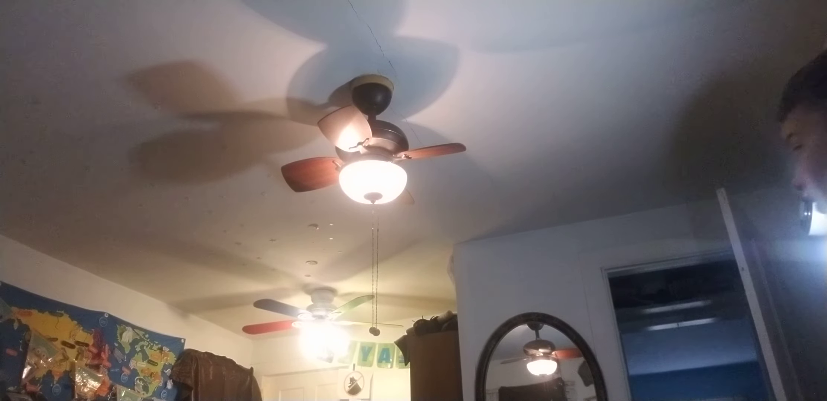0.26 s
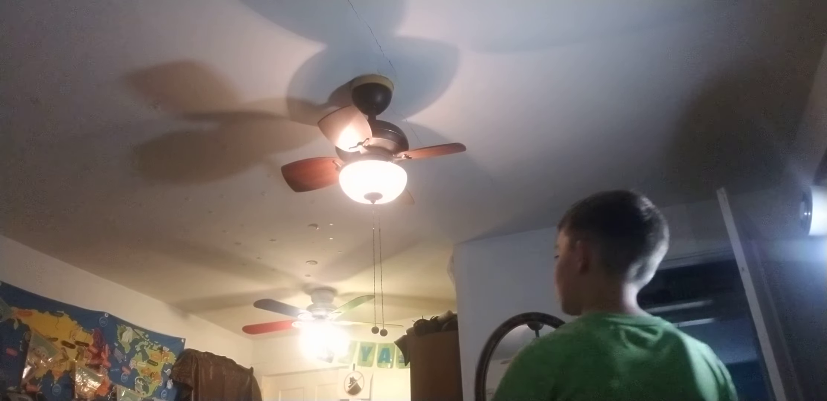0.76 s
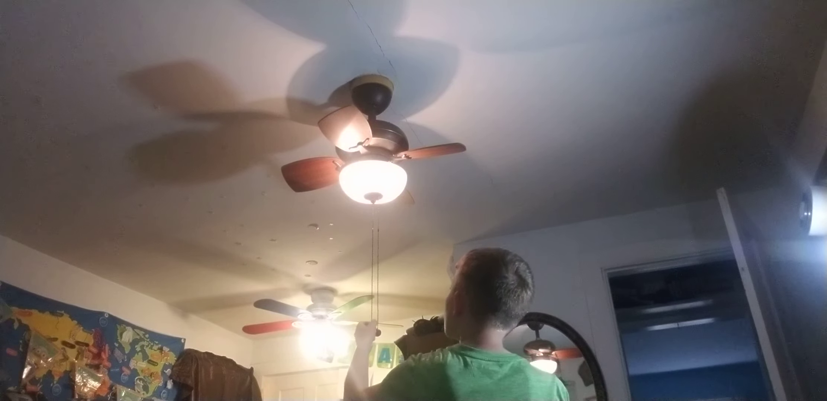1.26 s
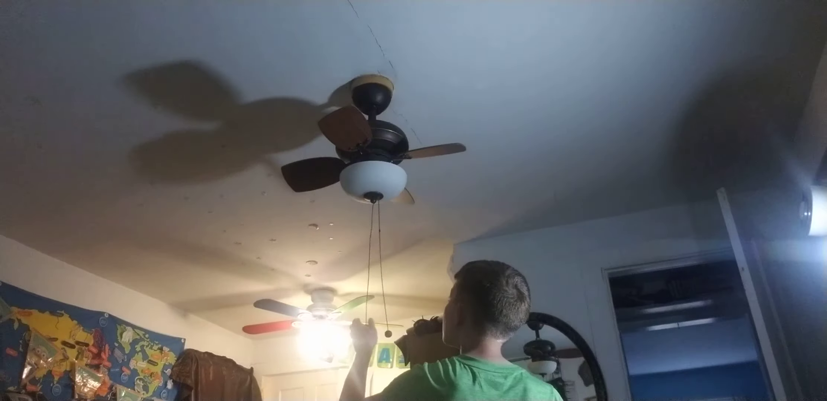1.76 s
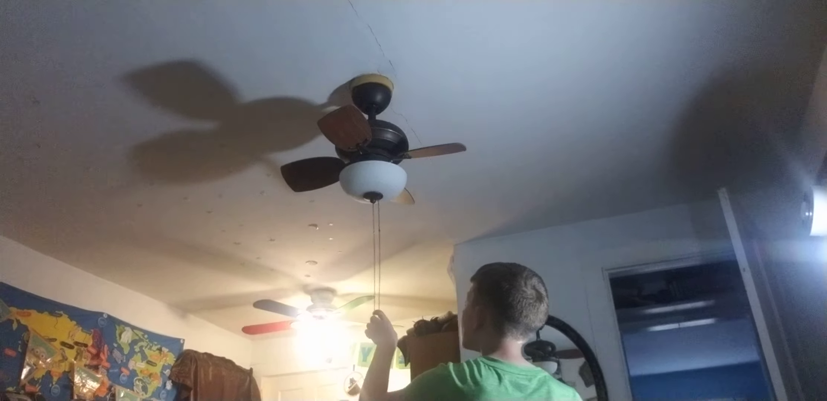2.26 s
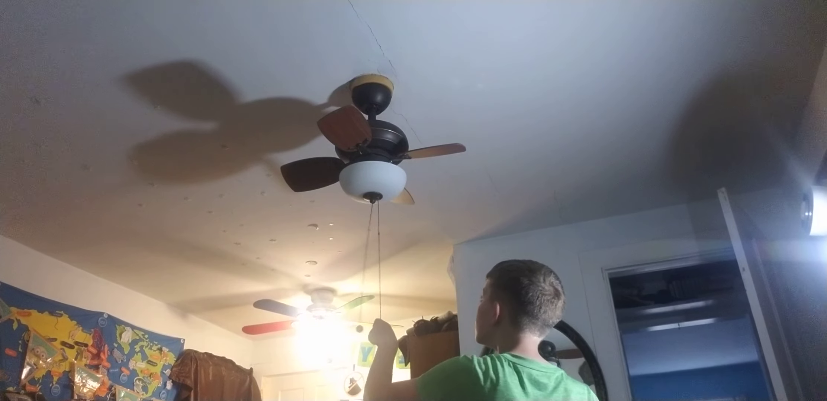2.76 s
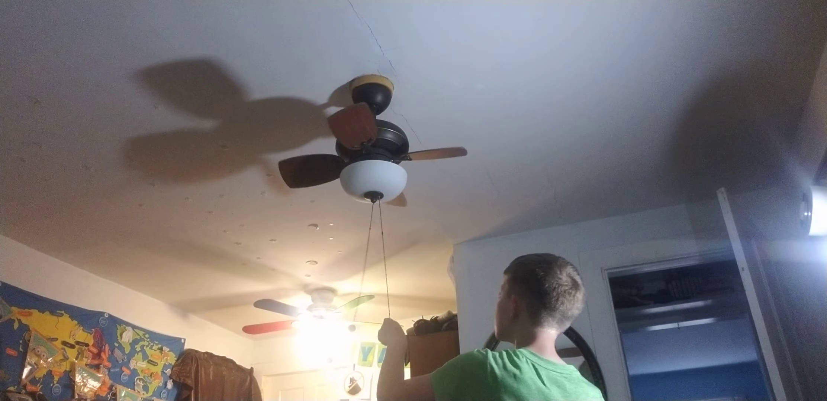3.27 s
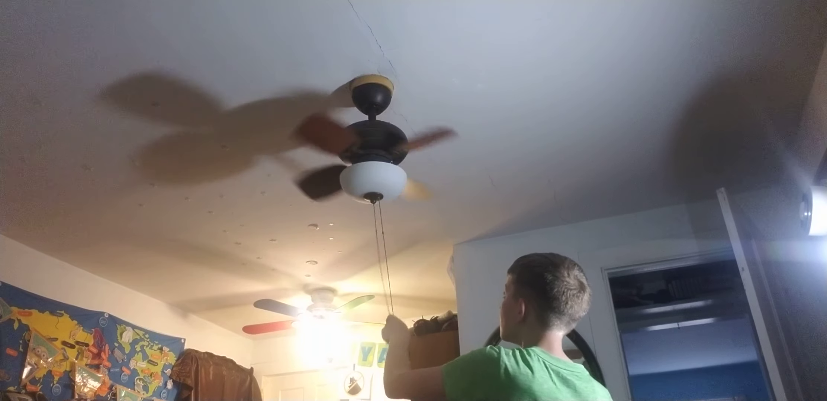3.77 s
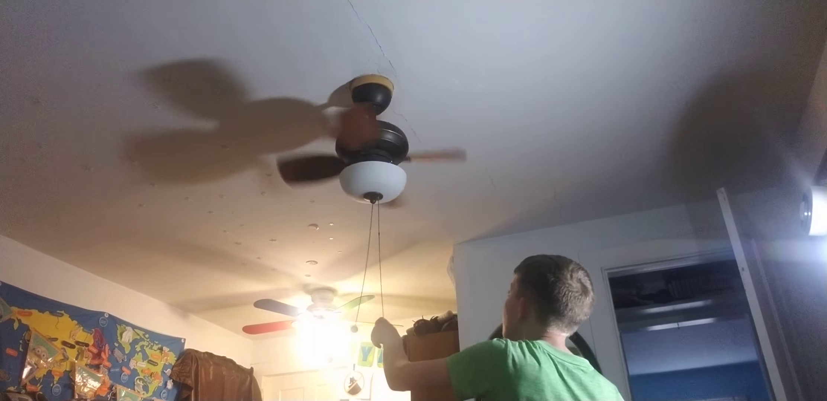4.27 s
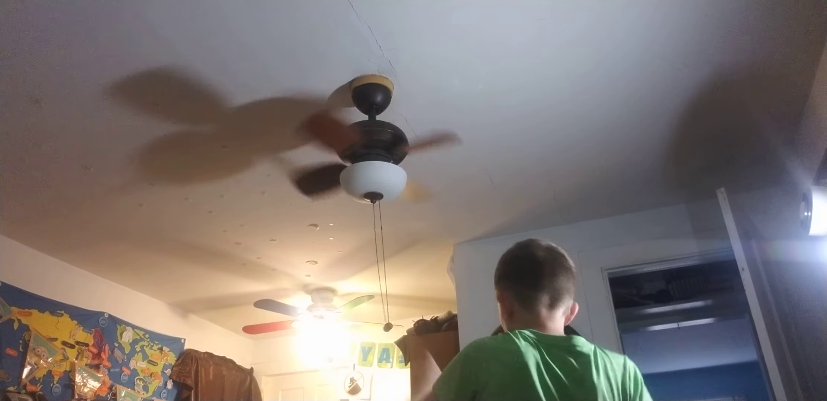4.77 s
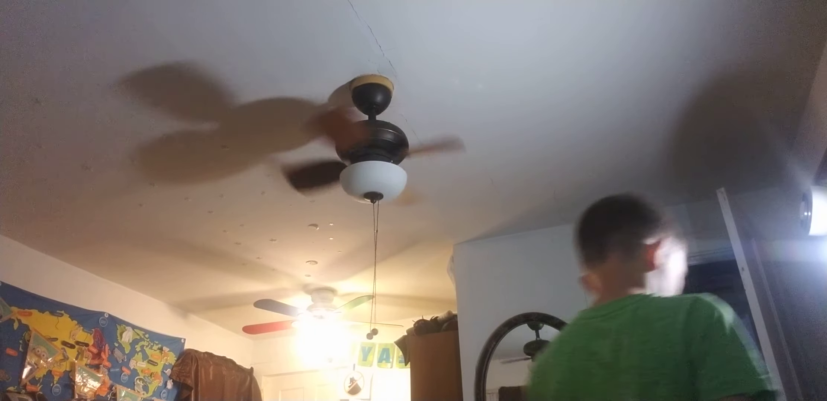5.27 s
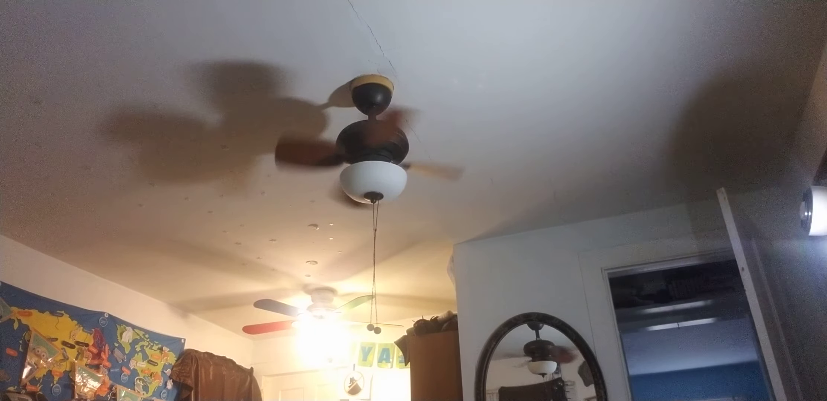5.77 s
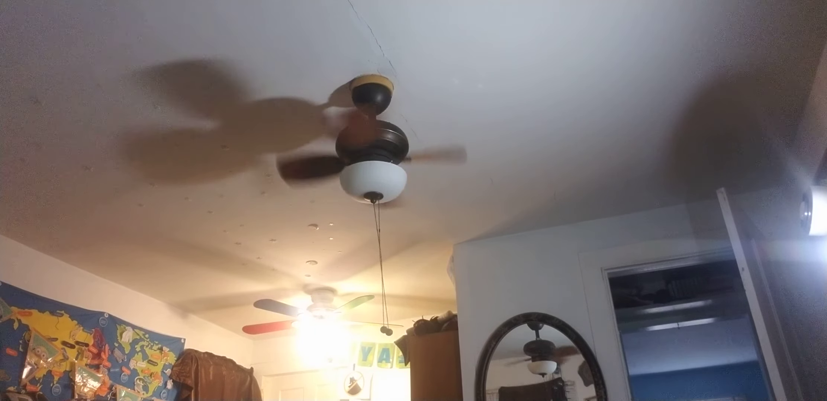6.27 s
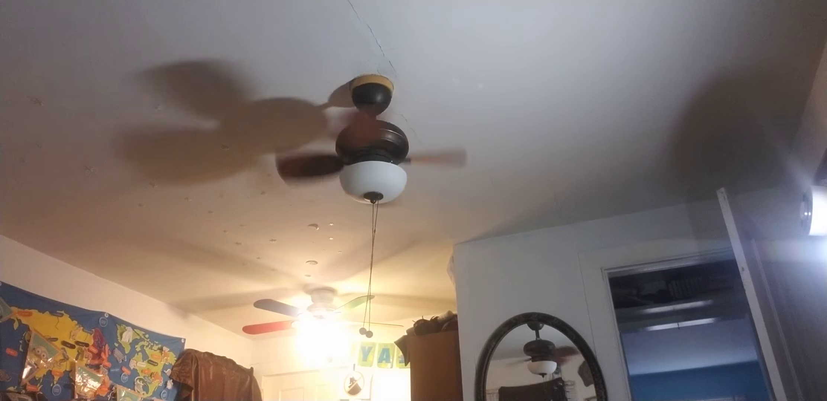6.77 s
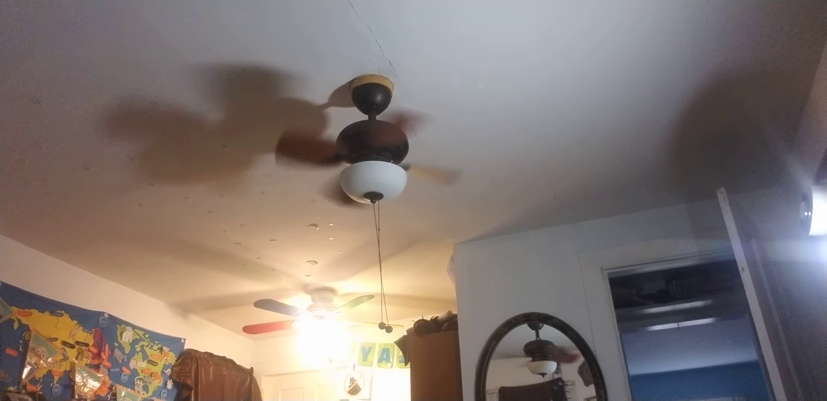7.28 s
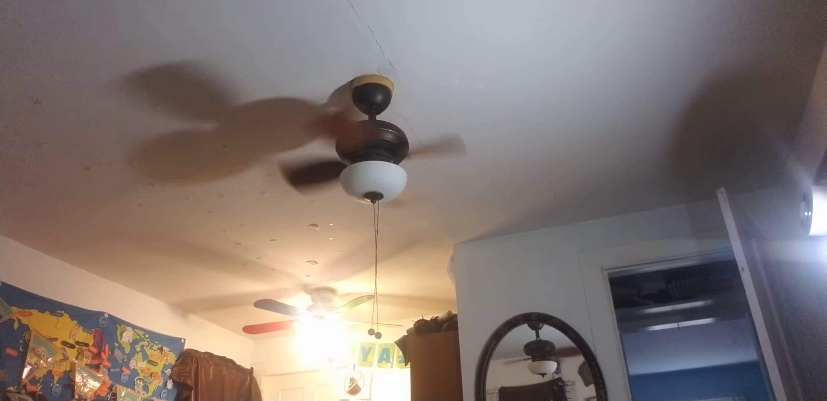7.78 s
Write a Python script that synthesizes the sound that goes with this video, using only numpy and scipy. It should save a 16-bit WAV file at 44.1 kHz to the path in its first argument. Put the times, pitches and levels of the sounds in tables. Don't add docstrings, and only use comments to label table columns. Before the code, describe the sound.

Ceiling fan pull chains worked close up: sharp metallic switch clacks, ratchet ticks and bead rattles over low steady hum, with footsteps on wooden boards.

```python
import sys
import numpy as np
from scipy import signal
from scipy.fft import rfft, irfft, next_fast_len
from scipy.io import wavfile
from scipy.ndimage import uniform_filter1d, map_coordinates

SR = 44100
rng = np.random.default_rng(int(sys.argv[2]) if len(sys.argv) > 2 else 0)


def boost_factor(decibels):
    exponent = np.asarray(decibels, float) / 20
    return 10 ** exponent


def master_out(mix):
    frames = np.transpose(np.atleast_2d(mix))
    ceiling = np.clip(frames, -1, 1)
    pcm = np.round(ceiling * 32767).astype(np.int16)
    wavfile.write(sys.argv[1], SR, pcm)


N = 354167

# pitch_hz, left_minus_right_db
PORT_LEAN = [(60, 2), (110, -0.5), (200, 5), (380, 3), (700, -0.5), (1290, 11.5), (2380, 4), (4400, 7.5),
             (8120, 5.5), (15000, -3.5)]
# pitch_hz, width_hz, level_db
HOUSING_MODES = [(712, 60, 7), (860, 60, 6), (1675, 80, 6), (1884, 70, 5), (2026, 90, 6), (2447, 90, 5),
                 (2885, 100, 4), (3940, 200, 8), (4200, 200, 6), (4575, 200, 8), (6000, 200, 4),
                 (6536, 120, 7), (6996, 150, 8), (9000, 200, 6), (10300, 300, 4), (11900, 300, 7),
                 (12400, 300, 7), (13700, 300, 4)]


def along(points, hz):
    f, v = np.transpose(points)
    return np.interp(np.log(hz + 1), np.log(f + 1), v)


def unit(x):
    return x / np.sqrt(np.mean(x ** 2) + 1e-20)


def bumps(modes, hz):
    return sum(db / (1 + (2 * (hz - c) / w) ** 2) for c, w, db in modes)


def curves(tables):
    out = np.full((len(tables[0][0]) - 1, N), -200.)
    for rows in tables:
        s, *cols = np.transpose(rows)
        k = np.arange(int(s[0] * SR), min(N, int(s[-1] * SR)))
        out[:, k] = [np.interp(k / SR, s, c) for c in cols]
    return out


def swells(start, peak, db, fall, stop=np.inf):
    rise_db, damping_db_per_s = 18.5, 2000
    t = np.arange(0, N + 64, 32)[:, None] / SR
    rising = rise_db * (peak - t) / np.maximum(peak - start, .002)
    below = np.where(t < peak, rising, fall * (t - peak))
    level = db - below - damping_db_per_s * np.maximum(t - stop, 0)
    return np.interp(np.arange(N) / SR, t[:, 0], level.max(axis=1))


def wobble(rate):
    coarse = np.arange(0, N + 16, 16)
    knots = rng.standard_normal(int(N * rate / SR) + 4)
    return np.interp(np.arange(N), coarse, map_coordinates(knots, [coarse * rate / SR]))


def ports(pair, colour_db):
    # pitch_hz, left_right_likeness
    likeness = [(60, 0.49), (130, 0.88), (290, 0.67), (640, 0.54), (1410, -0.26), (3100, 0.05),
                (6820, -0.037), (15000, -0.07)]
    m = next_fast_len(pair.shape[1] + 4096)
    hz = np.fft.rfftfreq(m, 1 / SR)
    turn = np.arccos(np.clip(along(likeness, hz), -1, 1)) / 2
    mid, side = rfft(pair, m) * boost_factor(colour_db(hz)) * [np.cos(turn), np.sin(turn)]
    lean = boost_factor(along(PORT_LEAN, hz) / 2)
    return irfft([(mid + side) * lean, (mid - side) / lean], m)[:, :pair.shape[1]]


def rush(colour_db):
    return unit(ports(rng.standard_normal((2, N)), colour_db))


def tail(direct_db, patchy_db, length_s=.33):
    # pitch_hz, t60_s
    room_decay = [(300, 0.1), (1000, 0.24), (2800, 0.28), (7000, 0.2), (15000, 0.2)]
    blow_db, blow_t60 = -1.5, 0.0065
    n = int(length_s * SR)
    hz, t, z = signal.stft(rng.standard_normal((2, n)), SR, nperseg=256)
    patches = uniform_filter1d(rng.standard_normal(z.shape[1:]), size=4, axis=0)
    patches = unit(uniform_filter1d(patches, size=3, axis=1))
    decay_db = 60 * t / along(room_decay, hz)[:, None]
    late = signal.istft(z * boost_factor(patchy_db * patches - decay_db), SR, nperseg=256)[1][:, :n]

    t = np.arange(n) / SR
    body = boost_factor(-60 * t / 0.022) * (1 - np.exp(-t / 0.0022))
    blow = boost_factor(blow_db - 60 * t / blow_t60) * (1 - np.exp(-t / 0.00035))
    return late * boost_factor(direct_db) * (body + blow), late * (1 - np.exp(-t / 0.0065))


def in_room(x, direct_db):
    room = sum(tail(direct_db, patchy_db=0))
    return signal.fftconvolve(x, room / np.linalg.norm(room[0]), axes=1)[:, :N]


def add(bus, s, sound):
    k = round(s * SR)
    bus[:, k:k + sound.shape[1]] += sound[:, :N - k]


def body_curve(knock, shell, snap, tick, tinkle, valley_db):
    return [(150, knock - 14), (380, knock + 3), (900, knock + 3),
            (1300, shell - 2), (2050, shell + 4), (2700, shell + 2),
            (3400, valley_db), (4400, snap), (5500, valley_db - 0.5),
            (6800, tick + 2), (8300, tinkle - 9), (12000, tinkle - 5), (16000, tinkle - 9)]


def cracks(events, modes, gain_db, direct_db, valley_db):
    bus = np.zeros((2, N))
    for s, db, knock, shell, tick, tinkle in events:
        early_curve = body_curve(knock, shell, 2.2, tick, tinkle, valley_db)
        late_curve = body_curve(knock, shell, -9, tick, tinkle, valley_db)
        struck = [(c * (1 + rng.normal(0, .004)), w, level + rng.normal(0, 2)) for c, w, level in modes]
        crack, late = tail(direct_db, patchy_db=3.0)
        near = ports(crack[:, :SR // 20], lambda hz: along(early_curve, hz) + bumps(struck, hz))
        far = ports(late, lambda hz: along(late_curve, hz) + 0.78 * bumps(struck, hz))
        add(bus, s, boost_factor(db + gain_db) * near)
        add(bus, s, boost_factor(db + gain_db) * far)
    return bus


def thuds(events):
    bus, t = np.zeros((2, N)), np.arange(SR // 3) / SR
    for s, db, hz, t60 in events:
        octaves, phases = np.r_[0, rng.normal(0, .4, size=11)], rng.random(12)
        ring = sum(boost_factor(-14 * abs(u)) * np.sin(2 * np.pi * (hz * 2 ** u * t + p))
                   for u, p in zip(octaves, phases))
        ring = 1.6 * ring / np.std(ring[:len(t) // 4])
        envelope = boost_factor(db - 60 * t / t60) * (1 - np.exp(-t / 0.014)) ** 2
        add(bus, s, (envelope * ring)[None] * boost_factor([[.5], [-.5]]))
    return bus


def rings(events, rise_s, split):
    bus, t = np.zeros((2, N)), np.arange(SR // 5) / SR
    for (s, db, hz, t60), chance in zip(events, rng.standard_normal((len(events), 4))):
        turns = hz * t + np.array([[0], [.25]]) * min(hz / 900, 1)
        trio = np.sin(2 * np.pi * turns)
        for u, p in chance.reshape(2, 2):
            trio = trio + .5 * np.sin(2 * np.pi * (turns * (1 + split * u) + p))
        lean_db = along(PORT_LEAN, hz) / 2 * np.array([[1], [-1]])
        add(bus, s, boost_factor(db - 60 * t / t60 + lean_db) * (1 - np.exp(-t / rise_s)) * trio)
    return bus


def motor():
    # pitch_hz, level_db
    hum_tones = [(16.2, -72), (58.4, -49), (81.8, -62), (117, -60), (120.03, -40.7), (178.4, -58),
                 (240.06, -68), (711, -75), (1093, -74)]
    # pitch_hz, density_db
    air_colour = [(12, -35.5), (25, -3.5), (55, -1.5), (80, 1), (120, 0.5), (155, 2.5), (230, -5),
                  (320, -5.5), (480, -9.5), (1050, -14.5), (1300, -24), (2000, -32), (5000, -40),
                  (16000, -41)]
    # pitch_hz, width_hz, level_db
    whine_humps = [(1101, 42, 5), (1640, 240, 4), (12800, 1700, 8.5)]
    beat_peak_s, beat_period_s, beat_depth = 4.98, 5.9, 0.4
    air_level_db = -52.5

    t = np.arange(N) / SR
    beat = 1 + beat_depth * np.cos(2 * np.pi * (t - beat_peak_s) / beat_period_s)
    tones = np.zeros(N)
    for k, (hz, db) in enumerate(hum_tones):
        tone = boost_factor(db + 0.14 * wobble(17)) * np.cos(2 * np.pi * hz * (t - .2))
        tones += tone * (beat if k == 1 else 1)
    air = rush(lambda hz: along(air_colour, hz) + bumps(whine_humps, hz))
    return np.sqrt(2) * tones + boost_factor(air_level_db + .8 * wobble(3)) * air


def footfalls():
    # start_s, peak_db, pitch_hz, t60_s
    heels = [(.13, -38.5, 172, 0.11), (0.375, -32.5, 161, 0.23), (0.442, -29, 51, 0.1),
             (0.951, -22, 147, 0.071), (2.641, -30.5, 156.5, 0.13), (4.665, -31, 218, 0.12),
             (5.321, -28.5, 158.5, 0.26), (5.329, -34, 50.3, 0.17), (5.781, -35.5, 181, 0.17),
             (5.912, -33, 170, 0.19), (6.108, -29, 106, 0.23), (6.121, -37, 44.4, 0.36),
             (6.482, -34.5, 55, 0.3), (6.571, -35.5, 59.2, 0.3)]
    # start_s, peak_db, pitch_hz
    board_hits = [(0.199, -44, 294), (.41, -45, 300), (0.461, -39.5, 334), (.5, -48, 359),
                  (0.869, -47, 305), (0.999, -44.5, 255), (4.661, -37, 331), (4.67, -48, 617),
                  (4.849, -44, 261), (5.332, -34.5, 280), (5.42, -41.5, 279), (5.93, -44, 747),
                  (5.985, -39.5, 372), (6.129, -40, 296), (6.479, -38, 300), (6.6, -43, 288)]
    # start_s, peak_db, pitch_hz, t60_s
    creaks = [(.199, -45, 1200, .05), (.207, -40, 614, 0.052), (1.18, -66, 2500, 0.44),
              (1.23, -60, 2460, 0.36), (4.66, -39, 201, .08), (4.66, -48, 1200, 0.046),
              (4.69, -49.5, 1100, .08), (4.855, -51, 885, 0.052), (5.31, -48, 505, 0.17),
              (5.34, -49.5, 670, 0.14), (5.4, -48, 363, .12), (5.788, -47, 1000, .06),
              (5.84, -38, 1035, 0.13), (5.85, -49, 1320, 0.14), (5.79, -52, 192, 0.092),
              (5.92, -43, 193, .12), (6.104, -49, 765, .07), (6.104, -51, 1300, 0.052),
              (6.13, -47.5, 1570, 0.062), (6.16, -58, 1580, .06), (6.178, -52, 1050, .08),
              (6.195, -47, 990, 0.095), (6.486, -30.5, 170, 0.094), (6.487, -45, 530, .08),
              (5.333, -28, 276, .08), (5.338, -50, 1100, .07), (.203, -47, 292, 0.29),
              (6.105, -39, 240, .06)]
    # start_s, peak_db, knock_db, brightness_db
    sole_taps = [(0.1993, -57, 16.5, -0.5), (.209, -62, 10, -6), (0.854, -58.5, 10, 3),
                 (.955, -62, 10, -11), (4.662, -52.5, 9, -4), (4.685, -56, 12, -4),
                 (4.8545, -56.5, 14.5, 3.5), (5.33, -61, 14, -6), (5.242, -75, -2, 3), (5.4184, -56, -7, 4),
                 (5.5785, -80, 2.7, 2), (6.1024, -57.5, 18, 3.5), (6.4865, -58.5, 16.5, -14)]
    shell_db, tick_db, tinkle_db = -5, -6, -0.5
    board_t60, board_ref_hz, board_damping = 0.14, 300, 0.32

    boards = [(s, db, hz, board_t60 * (board_ref_hz / hz) ** board_damping) for s, db, hz in board_hits]
    taps = [(s, db, knock, shell_db, tick_db + bright, tinkle_db + bright)
            for s, db, knock, bright in sole_taps]
    tapping = cracks(taps, [], gain_db=6.0, direct_db=-2.5, valley_db=-7.0)
    return thuds(heels + boards) + rings(creaks, rise_s=0.0022, split=0.046) + tapping


def rubbing():
    # start_s, peak_s, sole_db, cloth_db
    scuffs = [(-.05, 0.02, -58.5, -53.5), (0.196, 0.198, -55, -67), (.28, 0.362, -80, -64.5),
              (.34, 0.502, -62.5, -65.5), (0.398, 0.693, -72, -66.5), (0.836, 0.889, -58.5, -63),
              (.97, 1.034, -74, -67), (1.178, 1.246, -51, -58), (4.54, 4.582, -85, -64.5),
              (4.53, 4.61, -84, -61), (4.655, 4.687, -51.5, -59), (4.66, 4.76, -58.5, -66),
              (4.84, 4.86, -70, -68), (4.798, 4.952, -60, -68.5), (5.242, 5.323, -59.5, -59.5),
              (5.405, 5.407, -58.5, -60), (5.779, 5.821, -51.5, -52), (5.785, 5.852, -49, -55.5),
              (5.85, 6.023, -63, -67), (6.095, 6.115, -57.5, -60), (6.08, 6.188, -49.5, -50.5),
              (6.464, 6.598, -62, -61.5), (6.63, 6.728, -71, -59), (7.03, 7.083, -89, -71.5),
              (7.26, 7.324, -68, -63.5), (7.405, 7.42, -75, -71), (7.65, 7.738, -72, -92)]
    # start_s, peak_s, level_db
    grit_strokes = [
        (1.196, 1.245, -58),
        (4.678, 4.745, -58.5),
        (5.23, 5.244, -61),
        (5.405, 5.412, -65),
        (5.573, 5.576, -62),
        (6.14, 6.193, -56),
        (6.8, 6.92, -74),
    ]
    # pitch_hz, density_db
    rub_colours = [
        [(300, -2), (700, -4), (1500, -8.5), (2500, -11), (4500, -18.5), (9000, -51)],
        [(2000, -13), (4000, -4), (6500, 2.5), (9000, -8), (16000, -15.5)],
        [(5000, -28), (9000, -6.5), (12500, 0.5), (16000, -4)],
    ]
    stroke_fall, grit_fall = 165, 212
    grit_under_cloth_db = -8.5

    start, peak, sole, cloth = np.transpose(scuffs)
    sole_db = swells(start, peak, sole, stroke_fall)
    cloth_db = swells(start, peak, cloth, stroke_fall)
    grit_db = np.maximum(swells(*np.transpose(grit_strokes), grit_fall), cloth_db + grit_under_cloth_db)
    out = np.zeros((2, N))
    for db, colour in zip((sole_db, grit_db, cloth_db), rub_colours):
        out += boost_factor(db + 1.7 * wobble(40)) * rush(lambda hz: along(colour, hz))
    return out


def lamp():
    # pitch_hz, width_hz, level_db
    lamp_modes = [(833, 300, 14), (1610, 230, 12), (2680, 330, 7.5), (3740, 540, 11), (4620, 400, 7.5),
                  (6000, 220, -2), (6820, 83, 18.5), (8600, 130, -5), (10760, 270, 10), (11800, 1100, 8)]
    # start_s, peak_db, knock_db, tick_db, tinkle_db (the last three over the snap band)
    lamp_pulls = [
        (1.509, -53, -1, -15, 2),
        (1.5318, -44.5, -21, -1, -2),
        (1.5516, -34, -10, -5, 13.5),
        (1.561, -45, -12, -8, 5),
        (1.661, -50, -7, 3, 8),
        (1.696, -44, -24, -1, 0),
        (1.7205, -29.5, -6, -6, 6),
        (1.8977, -56.5, 1, 4.5, 9),
        (2.0568, -61.5, 13, 8.5, 4),
    ]
    shell_db = -6
    contacts = [(s, db, knock, shell_db, tick, tinkle) for s, db, knock, tick, tinkle in lamp_pulls]
    return cracks(contacts, lamp_modes, gain_db=-6.0, direct_db=4.5, valley_db=-8.0)


def bead_ticks(rate):
    hits = rng.random((2, N)) < rate / SR
    return hits * rng.standard_normal((2, N)) * boost_factor(2.5 * rng.exponential(size=(2, N)))


def chain():
    # start_s, end_s, first_db, last_db
    rattles = [
        (1.51, 1.56, -63, -50),
        (1.662, 1.73, -62, -54),
        (2.568, 2.639, -53.5, -40.5),
        (2.654, 2.7, -52, -52),
        (3.0, 3.16, -63, -66.5),
        (3.161, 3.24, -45, -52),
        (3.464, 3.536, -46.5, -39),
        (3.744, 3.8, -51, -51.5),
        (3.982, 4.076, -61, -29.5),
        (4.28, 4.38, -55, -48),
    ]
    # pitch_hz, density_db
    bead_colour = [(880, -37), (1500, -7.5), (1690, -9.5), (1960, -12), (2860, -6.5), (3380, -43),
                   (4000, 1), (4590, -8), (5940, -34), (6760, 1), (7390, -10.5), (12400, -5), (16000, -3)]
    # time_s, level_db
    drag_level = [
        (2.66, -70),
        (2.7, -56),
        (2.8, -59),
        (2.936, -63),
    ]
    # pitch_hz, width_hz, level_db
    drag_modes = [(4510, 120, -6), (6760, 33, 1), (8100, 65, -12), (9020, 66, -4), (10300, 36, -5),
                  (10800, 92, -2), (11200, 140, -3), (12000, 53, -5.5), (12500, 160, 0), (13500, 180, -8),
                  (14500, 140, -2), (15300, 31, -9)]
    # pitch_hz, density_db
    drag_fill = [(2000, -16), (4500, -6), (5600, -13), (6800, -1), (8000, -7), (12000, -1), (16000, 0)]
    drag_ring_db = 10

    pull_db = curves([[(a, first), (b, last)] for a, b, first, last in rattles])[0]
    beads = ports(bead_ticks(600), lambda hz: along(bead_colour, hz) + .5 * bumps(HOUSING_MODES, hz))
    taut = [(c, w + 250, max(db + drag_ring_db, 0)) for c, w, db in drag_modes]
    slide = ports(bead_ticks(3600), lambda hz: along(drag_fill, hz) + bumps(taut, hz))
    sliding = boost_factor(curves([drag_level])[0]) * unit(slide)
    return in_room(boost_factor(pull_db) * unit(beads) + sliding, direct_db=15)


def fittings():
    # start_s, peak_db,
    # pitch_hz, t60_s
    fitting_rings = [(1.552, -28, 11700, 0.11), (1.552, -49, 1660, 0.13), (1.552, -44, 4350, .04),
                     (1.721, -46, 816, 0.047), (1.721, -45.5, 1027, 0.12), (1.721, -55, 1680, 0.14),
                     (1.721, -46, 2710, 0.13), (1.721, -36.5, 3870, 0.063), (1.722, -46, 6040, 0.075),
                     (2.572, -47, 6820, 0.13), (2.632, -49, 2450, 0.19), (2.632, -53, 1895, .2),
                     (2.632, -51, 2850, 0.23), (2.939, -41.5, 1010, 0.14), (2.939, -46, 1396, 0.13),
                     (2.945, -45, 2470, 0.2), (2.939, -36, 4400, .05), (2.95, -56, 4040, 0.29),
                     (2.94, -42, 6530, 0.14), (2.97, -55, 2820, 0.24), (3.229, -39, 1660, 0.071),
                     (3.236, -39.5, 2020, 0.17), (3.23, -46, 2450, 0.2), (3.229, -46, 4700, 0.24),
                     (3.459, -41.5, 6860, 0.13), (3.5, -52, 695, 0.17), (3.53, -48.5, 1420, 0.15),
                     (3.53, -41, 713, 0.19), (3.53, -42, 856, 0.14), (3.529, -31, 4510, 0.076),
                     (3.768, -45, 6870, .1), (3.796, -40, 4300, .04), (3.797, -32, 4620, 0.09),
                     (3.8, -43, 2040, 0.14), (3.8, -48, 2490, 0.23), (4.04, -36, 887, 0.09),
                     (4.072, -45, 860, 0.13), (4.074, -41, 2450, 0.18), (4.0745, -20, 12340, 0.04),
                     (4.072, -43, 6590, .1), (4.373, -39, 1700, 0.054), (4.373, -40, 2937, 0.098),
                     (4.378, -39, 2027, 0.19), (4.375, -45, 2450, .2), (4.373, -42, 4130, 0.07),
                     (1.662, -54, 6860, 0.18), (1.695, -54, 7200, 0.14), (1.5324, -55, 4800, 0.024),
                   (1.553, -35, 10200, .05), (3.787, -48, 6900, .06), (3.769, -44, 4700, .06),
                   (4.003, -48, 6700, .1), (4.003, -50, 4300, 0.076), (4.07, -29, 5000, .04),
                   (4.089, -27, 13000, 0.048), (4.345, -34, 10600, .02), (4.413, -37, 12000, .04),
                   (3.228, -33, 4640, .04), (3.228, -41, 9300, .05), (3.529, -25.5, 11000, 0.064),
                   (3.459, -46, 4300, .12), (2.632, -42, 3900, .05), (4.664, -50, 3800, .04),
                   (4.68, -56, 2900, 0.33)]
    return rings(fitting_rings, rise_s=0.0028, split=0.029)


def switch():
    # start_s, peak_db, knock_db, rebound_after_s, rebound_loss_db
    snap_events = [
        (2.6305, -31.5, -3.5, 0.015, 1),
        (2.938, -21, -3.5, 0.013, 10),
        (3.2281, -23.5, -13, 0.019, 14),
        (3.5278, -21, -3, 0.012, 16),
        (3.7952, -21, -11, 0.0065, 18),
        (4.0694, -23, -1.5, .005, 7.5),
        (4.371, -23.5, -15.5, 0.017, 14),
    ]
    # start_s, peak_db, knock_db, shell_db,
    # brightness_db
    ratchet_teeth = [(2.5712, -42.5, -3, -27, -0.5), (2.5963, -39, -1, -13, 0), (3.1619, -43.5, -7, -14, 6),
                     (3.1825, -44.5, 0, -6, 11), (3.1939, -44, 2, 2, 12), (3.208, -37, -11, -7.5, 5.5),
                     (3.458, -39.5, 2, -26, 10), (3.497, -25.5, -2.5, -16.5, -4.5),
                     (3.6686, -55.5, -10, -18, 4.5), (3.7458, -49.5, -17, -19, 6),
                     (3.768, -43, 2, -14, 5.5), (3.7792, -34, -14, -6.5, 7.5), (3.787, -40, -16, -9, 12),
                     (3.9844, -60, -18, -26, -3), (4.003, -48, -21, -18, -6), (4.0252, -35.5, -2, -14, -10),
                     (4.0381, -30, -12.5, -12, 1.5), (4.044, -31, -4, -7, -2.5), (4.084, -31, 5, -20, -4),
                     (4.291, -47, 5, -7, 9), (4.335, -38, -1.5, -1.5, 8.5), (4.281, -54, -11, -15, 8),
                     (4.32, -46, -8, -11, 0), (4.345, -45, -15, -4, 5), (4.354, -51, -16, -8, -6.5),
                     (4.413, -40, -6, -11, 1.5)]
    snap_colour, rebound_colour = (-10.5, -9.5, 3.55), (-5.5, -15, -2.4)  # shell_db, tick_db, tinkle_db
    tooth_tick_db, tooth_tinkle_db = -10, 3.2
    shell_takes, usual_knock_db = 0.55, -8.5
    hard_rebound_db, brightens = -4, 0.31
    ceiling_hz, ceiling_t60, ceiling_db = 340.8, 0.21, -17

    blows, thumps = [], []
    for s, db, knock, after, loss in snap_events:
        to_shell = shell_takes * (usual_knock_db - knock)
        shell, tick, tinkle = snap_colour
        blows.append((s, db, knock, shell + to_shell, tick, tinkle))
        shell, tick, tinkle = rebound_colour
        tinkle += brightens * (hard_rebound_db - loss)
        blows.append((s + after, db - loss, knock, shell + to_shell, tick, tinkle))
        thumps.append((s, db + knock + ceiling_db, ceiling_hz, ceiling_t60))
    teeth = [(s, db, knock, shell, tooth_tick_db + bright, tooth_tinkle_db + bright)
             for s, db, knock, shell, bright in ratchet_teeth]
    contacts = cracks(teeth + blows, HOUSING_MODES, gain_db=-4.5, direct_db=7.0, valley_db=-9.5)
    return thuds(thumps) + contacts


def shade():
    # start_s, peak_s, damped_at_s, lowest_mode_db, upper_modes_db
    rocks = [
        (4.655, 4.67, 4.75, -70, -63),
        (4.67, 4.69, 4.75, -59, -64),
        (4.66, 4.715, 4.75, -58, -65),
        (4.69, 4.757, 4.785, -58, -67),
        (4.8, 4.815, 4.858, -69, -80),
    ]
    # pitch_hz, level_db, joins_at_s
    glass_modes = [(3569, 0, 4.684), (4818, -3, 4.725), (5800, 0, 4.738), (6320, 3, 4.676),
                   (8080, -1, 4.677), (9555, 3, 4.664), (10370, 4, 4.71), (13550, 2, 4.669)]
    low_fall, upper_fall = 70, 110
    loss_db_per_cycle = .008

    start, peak, stop, low, upper = np.transpose(rocks)
    live = slice(int(start[0] * SR), int(stop[-1] * SR) + SR // 20)
    low_db = swells(start, peak, low, low_fall, stop)[live]
    upper_db = swells(start, peak, upper, upper_fall, stop)[live]
    out, t = np.zeros((2, N)), np.arange(N)[live] / SR
    lag = np.array([[0], [.15]])
    for k, (hz, db, joins) in enumerate(glass_modes):
        swell = 3.2 * wobble(70)[live] - 3000 * np.maximum(joins - t, 0)
        waver = .16 * wobble(120)[live]
        held_db = upper_db - loss_db_per_cycle * hz * (t - t[0]) if k else low_db
        tone = np.sin(2 * np.pi * (hz * t + lag + waver))
        out[:, live] += boost_factor(db + held_db + swell) * tone * boost_factor([[2], [-2]])
    return out


def hinge():
    # time_s, pitch_hz, level_db, pitch_scatter
    squeaks = [
        [(7.408, 2220, -80, .06), (7.417, 2220, -59, .06), (7.455, 2240, -60, .045), (7.47, 2220, -69, .045),
         (7.54, 2120, -84, .06)],
        [(7.665, 2470, -82, .014), (7.7, 2390, -74, .012), (7.75, 2330, -74, .01), (7.785, 2320, -79, .014),
         (7.85, 2300, -90, .02)],
    ]
    hinge_db, firm_db, overtones_grow = -0.5, -60, 1.1

    hz, db, scatter = curves(squeaks)
    scatter = np.maximum(scatter, 0)
    over_db = overtones_grow * (db - firm_db)
    turns = np.cumsum(np.maximum(hz, 0) * (1 + scatter * wobble(750))) / SR
    slips = sum(boost_factor(level_db + (k > 0) * over_db) * np.sin(2 * np.pi * (k + 1) * turns)
                for k, level_db in enumerate([3, -4, -13, -20]))
    grip = boost_factor(db + hinge_db + 80 * scatter * wobble(500))
    return in_room(grip * slips * boost_factor([[3], [-3]]), direct_db=18)


def scene():
    person = footfalls() + rubbing()
    fan = lamp() + chain() + fittings() + switch() + shade()
    return motor() + person + fan + hinge()


def band_limit(x):
    return signal.sosfilt(signal.butter(12, 16820, fs=SR, output="sos"), x)


def record(dry):
    top_hz = 15750
    m = next_fast_len(N + 4096)
    hz = np.fft.rfftfreq(m, 1 / SR)
    limit = boost_factor(-48 * np.clip((hz - top_hz) / 150, 0, 1))
    mix = irfft(rfft(dry, m) * limit, m)[:, :N]
    return band_limit(mix)


dry = scene()
out = record(dry)
master_out(out)
```